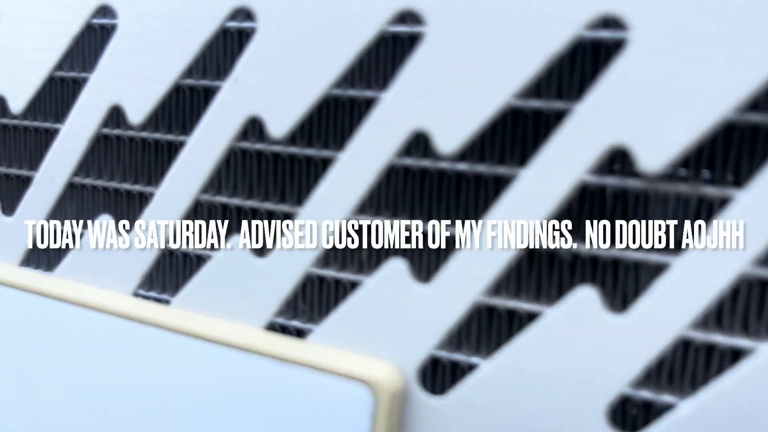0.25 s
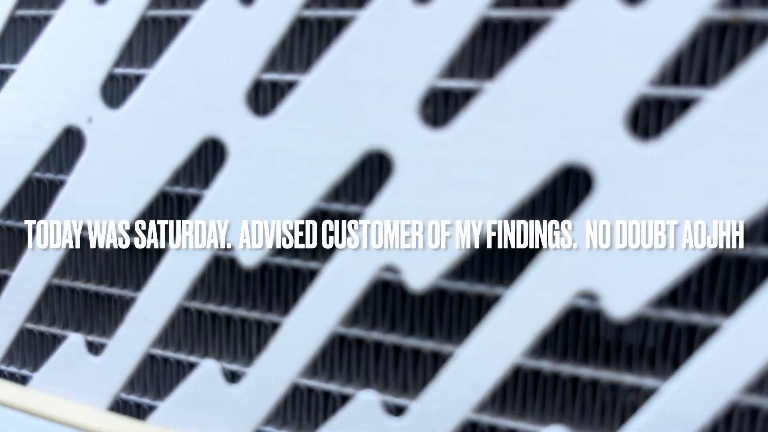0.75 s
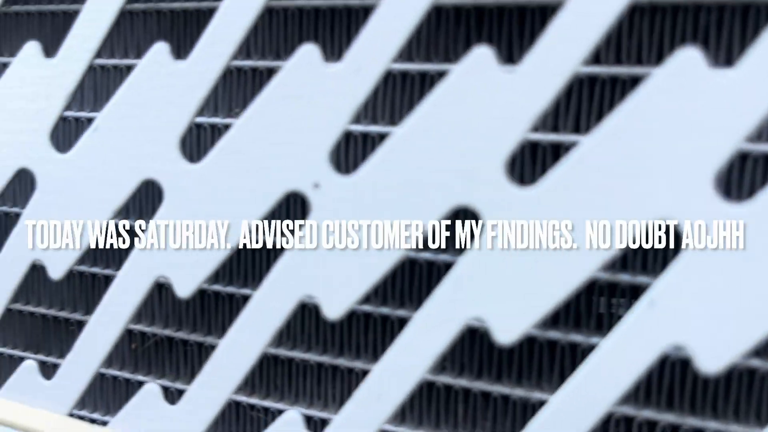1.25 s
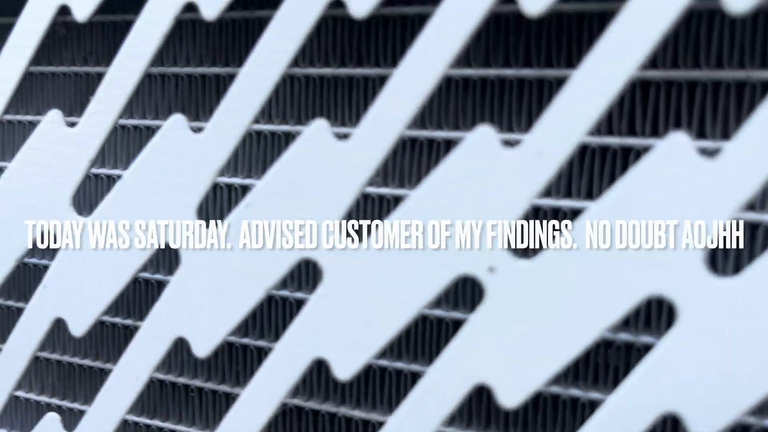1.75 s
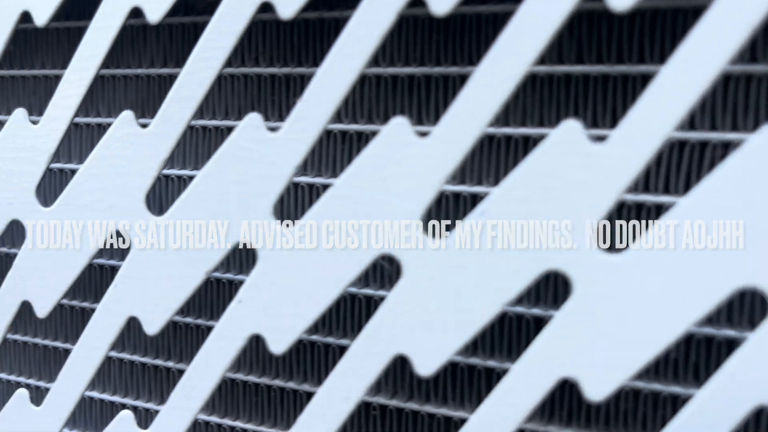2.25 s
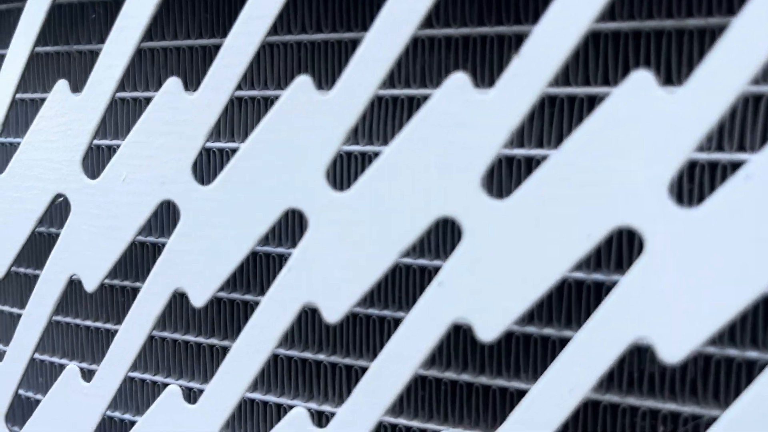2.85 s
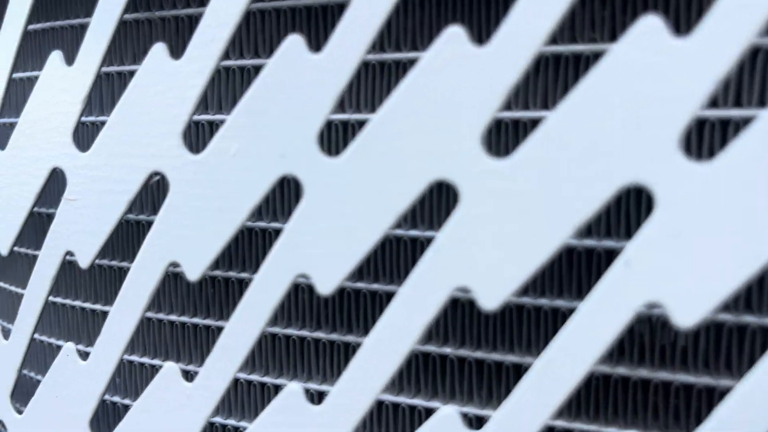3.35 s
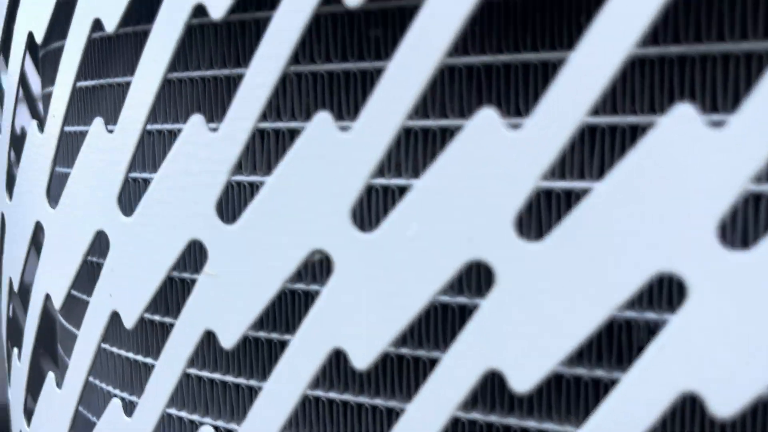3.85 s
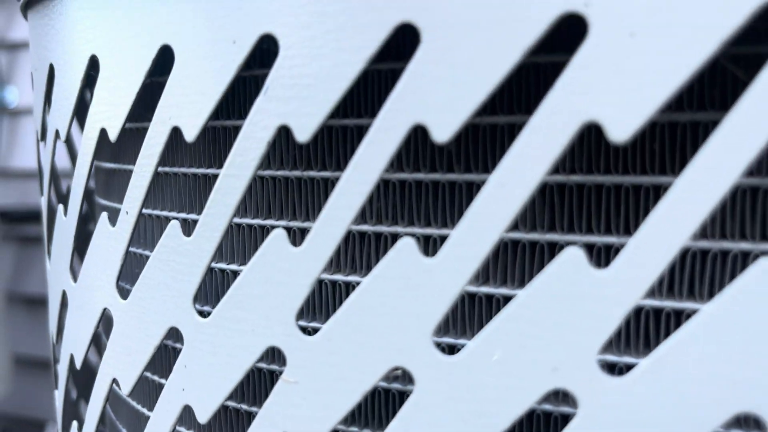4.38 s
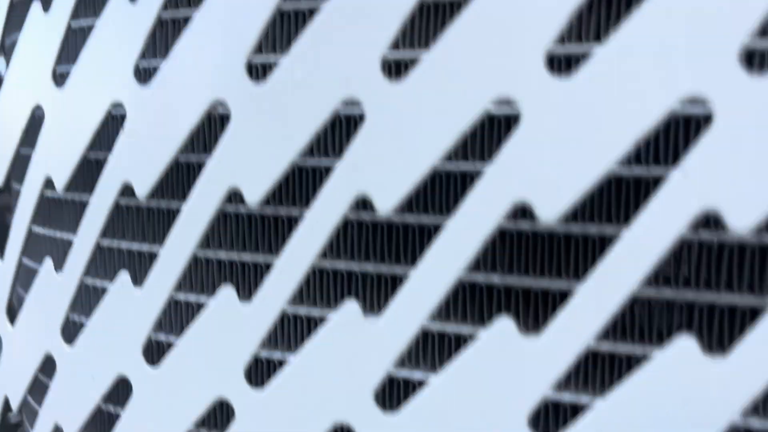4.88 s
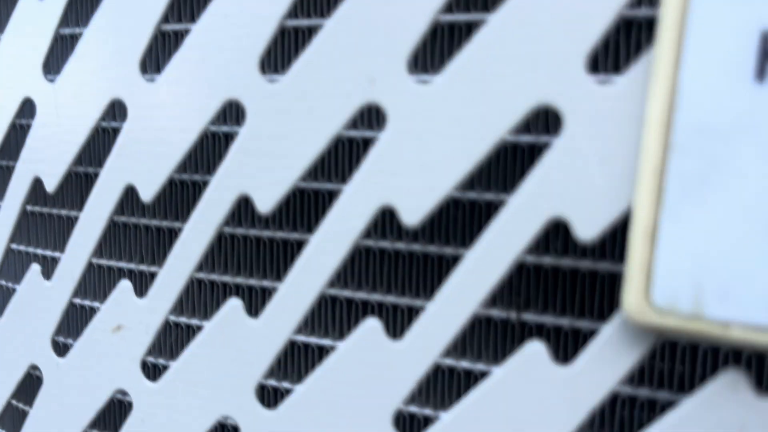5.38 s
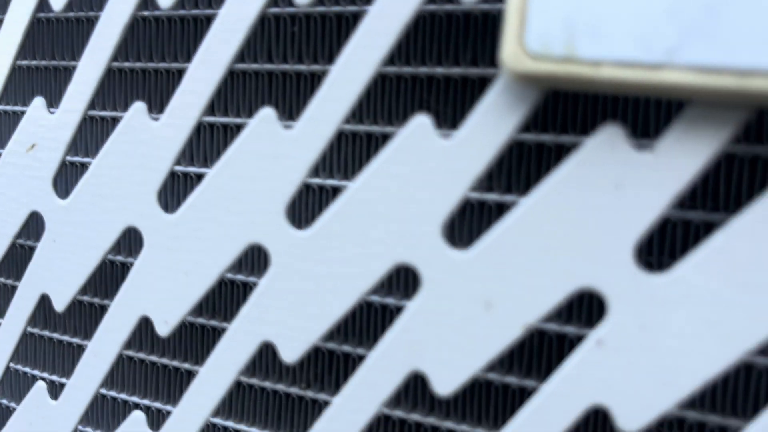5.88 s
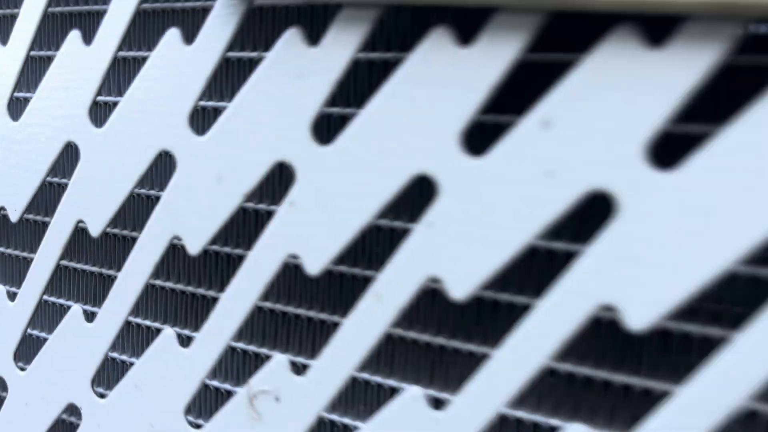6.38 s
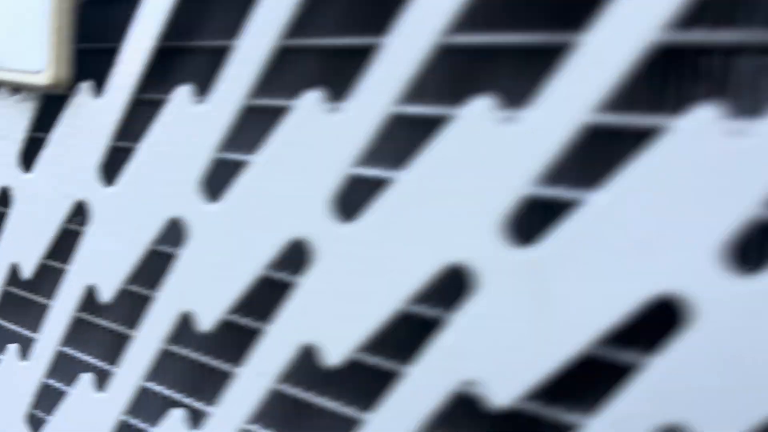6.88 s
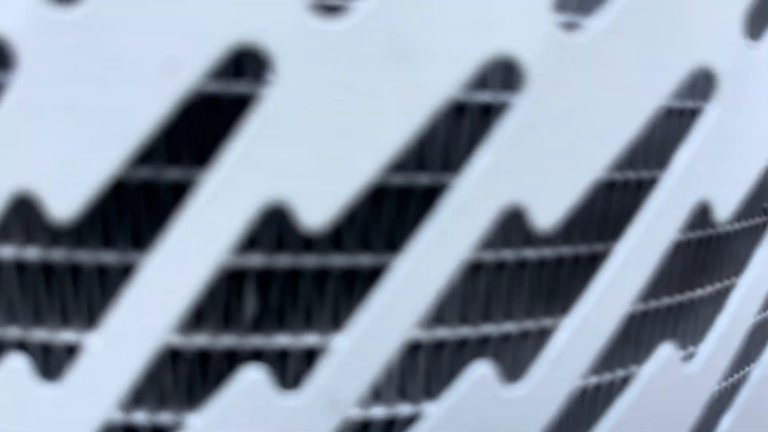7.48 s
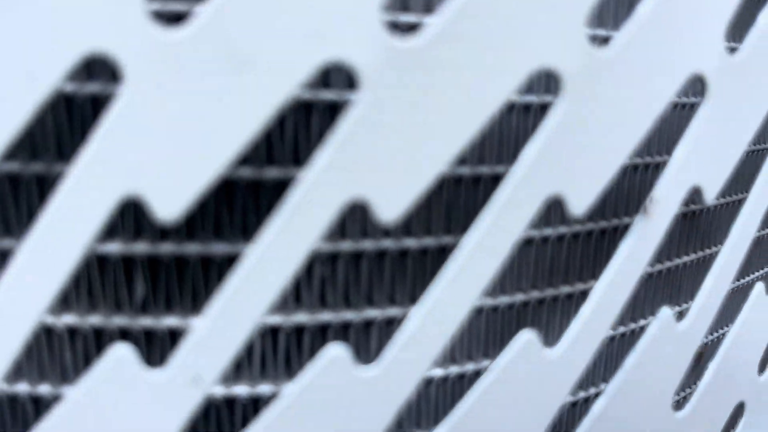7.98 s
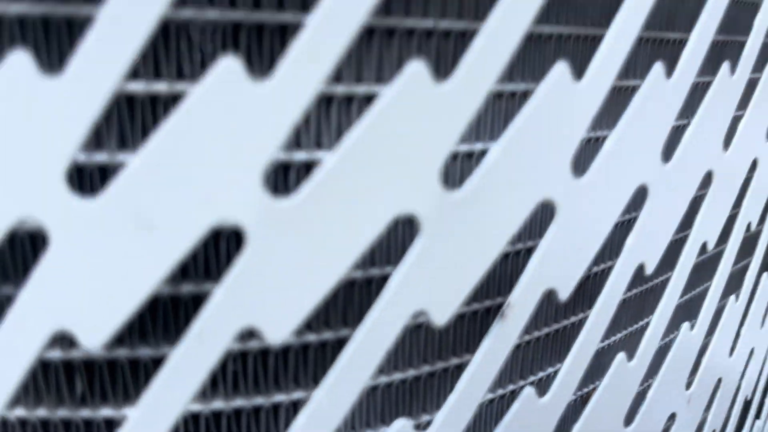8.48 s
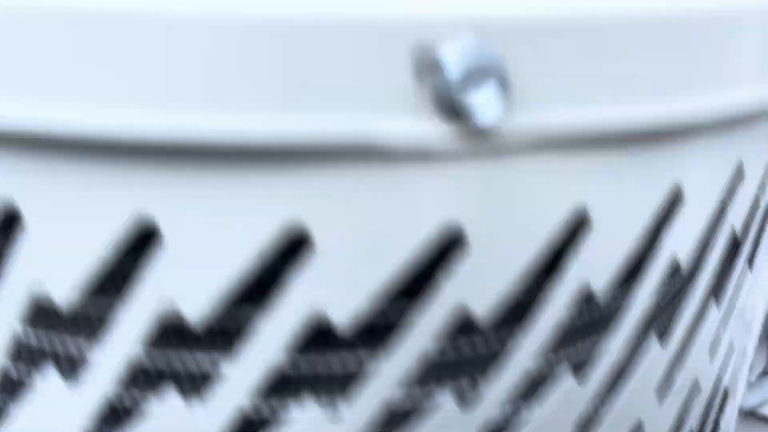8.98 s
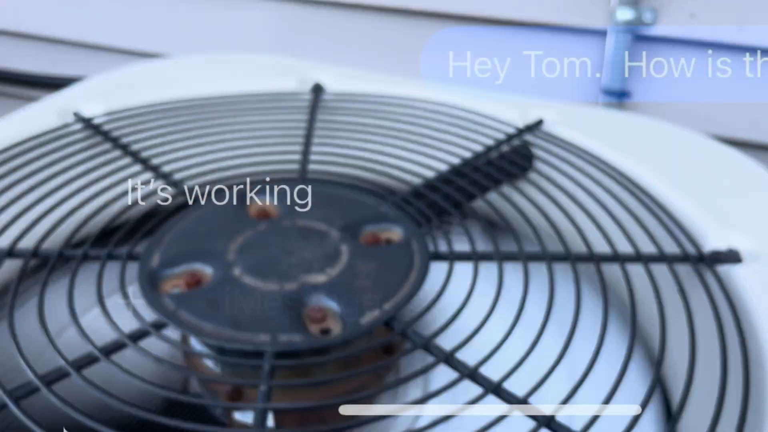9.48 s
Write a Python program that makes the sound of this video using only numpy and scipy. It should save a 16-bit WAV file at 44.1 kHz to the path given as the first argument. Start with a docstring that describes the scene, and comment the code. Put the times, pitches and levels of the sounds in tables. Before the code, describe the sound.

Heard from a handheld microphone right beside its grille, an outdoor air conditioner rumbles continuously, its fan blades chopping the rushing air into a fast pulse. A metallic compressor buzz, a hum and a thin, faint motor whine shift as the microphone moves, and low gusts occasionally buffet it. The drone dips and changes tone over the top of the unit, just before a small handling tick and a soft bump.

```python
"""A low, throbbing fan drone in a rush of air: an outdoor air-conditioning unit, heard from a phone
carried slowly along its grille and finally lifted above it. Two blades pulse at their passing rate and
chop the air into puffs, some of which slap the grille. The compressor buzzes through its ringing shell,
mains hum and a thin motor whine sit in the rush, and stray gusts buffet the microphone.
A tick of the grip and a soft finger knock come at the very end."""
import sys
import numpy as np
from scipy import signal
from scipy.fft import irfft, next_fast_len
from scipy.io import wavfile

SR = 44100
rng = np.random.default_rng(int(sys.argv[2]) if len(sys.argv) > 2 else 0)


def dump_mix(stems):
    """Bounce the given channels to the path in sys.argv[1] as a 16-bit WAV at rate SR."""
    frames = np.atleast_2d(stems).T  # one column per channel
    limited = np.clip(frames, -1, 1)  # hard clip at full scale
    pcm = np.round(limited * 32767).astype(np.int16)
    wavfile.write(sys.argv[1], SR, pcm)


N = 429534
T = np.arange(N) / SR
SIDES = np.array([[1], [-1]])  # left, right
BLADE_HZ, COMPRESSOR_HZ = 37.514, 59.035


def undb(db):
    """Decibels to gain."""
    return 10 ** (np.asarray(db) / 20)


def level(x, db):
    """Scale to an rms level."""
    return x * undb(db) / np.sqrt(np.mean(x ** 2))


def curves(table):
    """One automation curve for each column after time_s."""
    times, *columns = np.transpose(table)
    return [np.interp(T, times, column) for column in columns]


def on_log(table, hz):
    """Read a table of freq_hz, value along a log frequency axis."""
    freqs, values = np.transpose(table)
    return np.interp(np.log(hz), np.log(freqs), values)


def wander(rate_hz):
    """Smooth random modulation through rate_hz new values a second."""
    place = np.arange(0, N / SR * rate_hz + 1, 1 / 8)
    k = place.astype(int)
    blend = (1 - np.cos(np.pi * (place % 1))) / 2
    knots = rng.standard_normal(k[-1] + 2)
    return np.interp(T * rate_hz, place, knots[k] * (1 - blend) + knots[k + 1] * blend)


def swell_envelope(rows, t):
    """Amplitude of a tone that rises in flat-topped swells."""
    return np.sqrt(sum(2 * undb(db) ** 2 * np.exp(-((t - s) / half) ** 4) for s, half, db in rows))


def noise(response):
    """Noise with the amplitude spectrum response(hz)."""
    size = next_fast_len(N)
    gain = response(np.arange(1, size // 2 + 2) * SR / size)
    live = gain > 0
    bins = np.zeros(len(gain), complex)
    bins[live] = gain[live] * (rng.standard_normal(live.sum()) + 1j * rng.standard_normal(live.sum()))
    return irfft(bins, size)[:N]


def bell_noise(centre_hz, octaves, db=0):
    """A bell-shaped band of noise at an rms level."""
    bell = lambda hz: np.exp(-(np.log2(hz / centre_hz) / octaves) ** 2) * (hz < 16 * centre_hz)
    return level(noise(bell), db)


def gliding_noise(glide, width_hz):
    """A narrow band of noise that follows a pitch and level curve."""
    hz, db = curves(glide)
    flutter = noise(lambda f: np.exp(-(f / width_hz) ** 2) * (f < 1500))
    return undb(db) * level(flutter * np.sin(2 * np.pi * np.cumsum(hz) / SR), 0)


def mains_hum(waver_db=4.0, blur_rad=1.73):
    """The motors hum on multiples of the mains, wavering in level and phase."""
    # hum partials: pitch_hz, level_db
    partials = [(240, -53), (360, -49.5), (480, -41.5)]
    return np.sqrt(2) * sum(
        undb(db + waver_db * wander(1.6)) * np.sin(2 * np.pi * hz * T + blur_rad * wander(5))
        for hz, db in partials)


def motor_whine(pitch_hz=4133, waver_db=3, drift_rad=.6, pan_db=5):
    """A thin motor tone that surfaces now and then, left of centre."""
    # swells of the whine: centre_s, half_length_s, level_db
    swells = [(1.1, .8, -58), (4.1, 1.3, -61), (6.0, .4, -57), (6.55, .25, -54), (7.2, .15, -57)]
    envelope = swell_envelope(swells, T) * undb(waver_db * wander(6) + SIDES * pan_db / 2)
    return envelope * np.sin(2 * np.pi * pitch_hz * T + drift_rad * wander(8))


def fin_hiss():
    """A faint band of hiss while the phone is close to the fins."""
    # sinking hiss: time_s, centre_hz, level_db
    glide = [(6.9, 3500, -62), (7.3, 3450, -53), (8.4, 3400, -51.5), (8.95, 3220, -55), (9.1, 3150, -66)]
    return gliding_noise(glide, width_hz=170)


def rim_ring():
    """The rush rings in the gap as the phone passes the rim."""
    # rising gap resonance: time_s, centre_hz, level_db
    glide = [(8.88, 1450, -60.0), (8.94, 1650, -45.0), (8.98, 1880, -39), (9.02, 2050, -58.0)]
    return gliding_noise(glide, width_hz=130)


def grip_tick(t60_s=.012):
    """A dry, bright tick of the grip."""
    # tick: start_s, level_db
    ticks = [(9.627, -41)]
    edge = bell_noise(7000, octaves=.8)
    return sum((T > s) * undb(db - 60 * np.clip(T - s, 0, None) / t60_s) * edge for s, db in ticks)


def finger_knock():
    """A finger bumps the phone: a soft, short thump with a dry edge."""
    # thump: start_s, level_db, pitch_hz, t60_s
    knocks = [(9.657, -15.5, 280, .09)]
    edge = bell_noise(1400, octaves=.82, db=-17)
    out = 0
    for start, db, hz, t60 in knocks:
        age = np.clip(T - start, 0, None)
        out += (age > 0) * undb(db - 60 * age / t60) * (np.sin(2 * np.pi * hz * age) + edge)
    return out


def buffet(width=.31, lumps_db=2.5):
    """Stray air crosses the microphone in low, lumpy gusts."""
    # gusts: centre_s, half_length_s, centre_hz, level_db
    gusts = [(.7, .2, 68.9, -27), (3.043, 0.026, 90.5, -18.5), (3.07, 0.026, 171, -22.5),
             (3.126, 0.022, 80, -23), (3.188, .02, 200, -27.5), (3.257, 0.034, 100, -18.5),
             (4.25, 0.28, 98, -32), (5.25, 0.37, 70, -25), (6.27, 0.022, 210, -26), (6.326, 0.023, 75, -17),
             (6.62, .025, 75, -18), (6.756, 0.4, 90, -26.5), (8.099, .15, 80, -33)]
    out = 0
    for s, half, hz, db in gusts:
        mid, side = (bell_noise(hz, octaves=.57) for _ in range(2))
        envelope = np.exp(-((T - s) / half) ** 2) * undb(lumps_db * wander(22))
        makeup = np.linalg.norm(envelope) / np.linalg.norm(envelope * mid)
        out += undb(db) * makeup * envelope * (mid + width * SIDES * side)
    return out


def outflow(pressure, width=.25):
    """The jet blown through the top guard, heard only from above the rim."""
    mid, side = (bell_noise(850, octaves=.45, db=-33) for _ in range(2))
    return np.clip(-pressure, 0, 1) * (mid + width * SIDES * side)


def air_rush(puff_phase, imbalance, near_db, flicker_db=1.0, swell_db=.3):
    """Air pours through fins and grille, flickering and throbbing twice per blade pass."""
    # spectrum of the air, mid channel: freq_hz, relative_density_db
    mid_spectrum = [(27, -20), (50, 13), (95, 7), (200, 1.5), (400, -0.5), (800, -10.5), (1100, -9),
                    (1400, -14.5), (2200, -18.5), (4200, -22), (5500, -28.5), (6500, -26.5), (8000, -39.5),
                    (9800, -40.5), (11500, -39.5), (12500, -50.5), (14000, -67)]
    # spectrum of the air, side channel: freq_hz, relative_density_db
    side_spectrum = [(27, -35), (50, 0), (95, 14.5), (200, -15), (400, -7), (800, -11), (1100, -10.5),
                     (1400, -13), (2200, -26), (4200, -23.5), (5500, -31.5), (6500, -28.5), (8000, -29.5),
                     (9800, -35), (11500, -92), (12500, -88), (14000, -63)]
    # how hard the blades chop each band: freq_hz, depth
    chop_depth = [(100, .1), (300, .4), (600, .55), (1100, .25), (2000, .33), (5000, .18), (12000, .1)]
    out, swell = 0, wander(6)
    throb = .98 * imbalance * np.cos(puff_phase) + np.cos(2 * puff_phase)
    for hz in 25 * 2 ** np.arange(0, 9.6, .5):  # half-octave steps
        band = lambda f: np.cos(np.pi * np.log2(f / hz)) * (abs(np.log2(f / hz)) < .5)
        mid = noise(lambda f: band(f) * undb(on_log(mid_spectrum, f)))
        side = noise(lambda f: band(f) * undb(on_log(side_spectrum, f)))
        chop = np.sqrt(np.clip(1 + on_log(chop_depth, hz) * throb, 0, None))
        # up close the top treble grows fastest; the bass fills the yard, so its rise is cancelled
        tilt_db = near_db * (.53 * (hz > 7000) - (hz < 600))
        out += undb(tilt_db + swell_db * swell + flicker_db * wander(10)) * chop * (mid + SIDES * side)
    presence = signal.butter(4, [1700, 7000], "band", fs=SR, output="sos")
    return out / np.std(signal.sosfilt(presence, out.mean(axis=0)))


def shell_zones(bearing, pressure, shadow_db=-1.5):
    """Low edge, high edge and level curve of each shell zone: loudest face on, shaded from above."""
    # borders of the zones' bands: edge_hz
    edges = [330, 980, 2000, 7300]
    # how each zone radiates: face_on_db, facing_rad, falloff_db_per_rad
    beams = [(-43, -2.5, 1), (-56, -2.0, 2), (-50, -1.5, 2.5)]
    # gaps in the casing that bare a zone: centre_s, half_length_s, zone_low_hz, boost_db
    gaps = [(0.83, 0.47, 980, 3), (8.4, 0.49, 980, 4.5), (6.5, 0.79, 2000, 5)]
    shade_db = shadow_db * (1 - np.clip(pressure, 0, 1)) ** 2
    for low, high, (db, facing, falloff) in zip(edges, edges[1:], beams):
        gap_db = sum(boost * np.exp(-((T - s) / half) ** 4) for s, half, hz, boost in gaps if hz == low)
        yield low, high, db - falloff * abs(bearing - facing) + shade_db + gap_db


def compressor(zones, echo_gain=.4, echo_ms=2.998, drift_ms=.48, spread_ms=.06, waver_db=2.5):
    """One stroke a turn rings the shell; an echo off the casing shifts as the phone moves."""
    # shell resonances: pitch_hz, bandwidth_hz, relative_db
    modes = [(411, 37, 4), (531, 18, -5), (643, 26, 0.5), (880, 64, -3.5), (1035, 85, 4.5), (1117, 108, 4),
             (1522, 58, -12), (1720, 22, -13.5), (1865, 110, -18.5), (2340, 330, -15), (2820, 220, -16),
             (3400, 530, -19.5), (5140, 560, -19), (6080, 650, -25.5)]
    # partials that sing out of the buzz: harmonic_number
    singing = [7, 9, 11, 17, 18, 19, 20, 21, 22, 25, 26, 27, 31, 33, 35, 40, 47, 48, 51, 55]
    # standing waves crossed, one list per singing partial: centre_s, half_length_s, level_db
    swells = [
        [(2, 0.46, -40.5), (5, 0.52, -39.5), (8.2, 0.64, -39.5)],
        [(.5, 0.61, -42), (2.5, 0.83, -49), (5.2, 0.53, -47), (8.6, 0.85, -43)],
        [(1.6, 1.9, -45), (6.3, 0.42, -43.5)],
        [(1, 1.7, -47), (3, .9, -52), (5.72, 0.82, -43), (6.7, 0.3, -46.5), (8.7, .9, -51)],
        [(.5, 0.64, -46.5), (2.2, 0.57, -48.5), (3.8, 1, -46.5), (5.75, 0.79, -41), (7.4, 0.33, -47),
         (8.3, 0.49, -39.5)],
        [(1, 1.5, -43), (3.7, 1.8, -47.5), (5.8, 0.74, -48.5), (7.8, 1.1, -40)],
        [(.9, .6, -51), (4.2, 0.72, -54), (6.35, 0.8, -46), (8.1, 0.69, -44)],
        [(1.6, 0.86, -53), (4.1, 0.52, -50), (6, .8, -50), (8, .6, -52)],
        [(5.2, .3, -51), (8, 0.89, -49.5)],
        [(.8, 0.9, -49), (5.4, 0.44, -51), (7.4, 0.88, -52), (8.6, .7, -51)],
        [(1.3, 1, -52), (2.75, 0.38, -49.5), (4.9, .4, -52), (8.7, 0.47, -56)],
        [(1, 0.46, -55), (8.5, 0.65, -53)],
        [(8, 1, -57.5)],
        [(.9, .7, -56), (7.9, .6, -54)],
        [(2.2, .9, -56.5)],
        [(.4, .5, -56), (2.7, 0.86, -56.5), (8.2, 0.92, -54.5)],
        [(2.7, .4, -52.5), (5.9, .5, -55)],
        [(1.8, 1.5, -56)],
        [(3.7, .7, -54)],
        [(6.8, .3, -53)],
    ]
    hz = COMPRESSOR_HZ * np.arange(1025)
    shell = sum((-1) ** k * undb(db) / (1 + 2j * (hz - pitch) / bandwidth)
                for k, (pitch, bandwidth, db) in enumerate(modes))
    smear_rad, uneven_db = 1.15, 2.8
    shell *= np.exp(1j * smear_rad * rng.standard_normal(len(hz)))  # still in step enough to pulse
    shell *= undb(uneven_db * (hz > 2000) * rng.standard_normal(len(hz)))  # many small treble modes
    phases = np.angle(shell[singing])
    shell[singing] = 0  # these get envelopes of their own
    coarse_t = T[::64]
    envelopes = [swell_envelope(rows, coarse_t) * undb(waver_db * wander(5)[::64]) for rows in swells]
    turns = COMPRESSOR_HZ * T + .0018 * wander(2.42)
    late_ms = echo_ms + drift_ms * wander(.494)
    out = np.zeros((2, N))
    for channel in out:
        delays_ms = spread_ms * wander(.42), late_ms + spread_ms * wander(.633)
        direct, echo = ((turns - COMPRESSOR_HZ * ms / 1000) % 1 for ms in delays_ms)
        for low, high, db in zones:
            stroke = level(irfft(shell * (hz > low) * (hz < high)), 0)
            grid = np.arange(len(stroke)) / len(stroke)
            for gain, place in (1, direct), (echo_gain, echo):
                channel += gain * undb(db) * np.interp(place, grid, stroke, period=1)
        for k, phase, envelope in zip(singing, phases, envelopes):
            channel += np.interp(T, coarse_t, envelope) * np.cos(2 * np.pi * k * direct + phase)
    return out


def blade_eddies(puff_phase, imbalance, scatter_db=2.4, imbalance_db=9.5, width=.21, pan_db=-5.5):
    """Two puffs of turbulence per blade pass, each its own size; imbalance favours one of the pair."""
    count = puff_phase / np.pi + 2.45
    index = count.astype(int)
    size_db = scatter_db * rng.standard_normal(index[-1] + 1)[index]
    size_db += imbalance_db * imbalance * (-1.) ** index
    puffs = undb(size_db) * np.sin(np.pi * (count % 1) ** .65) ** 2.6  # rise faster than they fade
    swirls = (np.tanh(bell_noise(480, octaves=.87)) for _ in range(2))  # the swirl saturates
    mid, side = (level(puffs * swirl, 0) for swirl in swirls)
    soften = signal.butter(4, [230, 760], "band", fs=SR, output="sos")
    return undb(SIDES * pan_db / 2) * signal.sosfilt(soften, mid + width * SIDES * side)


def grille_slaps(eddy_db, accent_db=10, pitch_range_hz=(330, 620), t60_s=.04, width=.2):
    """Strong eddies hit the grille, each a pitched suction pulse with a broad burst of hiss."""
    # slaps: start_s
    starts = [.848, 3.855, 4.665, 4.934, 5.174, 5.786, 6.212, 6.293, 7.158, 7.185, 7.212, 7.452, 7.531,
              7.745, 7.797, 7.904, 8.172, 8.224, 8.305, 8.438, 8.489, 8.598, 9.214]
    mid, side = (bell_noise(700, octaves=.97, db=-5) for _ in range(2))
    out = 0
    for start, hz in zip(starts, rng.uniform(*pitch_range_hz, len(starts))):
        age = np.clip(T - start, 0, None)
        suction = -np.sin(2 * np.pi * hz * age)
        out += (age > 0) * undb(-60 * age / t60_s) * (suction + mid + width * SIDES * side)
    return undb(eddy_db + accent_db) * out


def strut_overtones(blade_phase, waver_db=3):
    """Blades passing the struts add faint upper harmonics that come and go."""
    out = 0
    for k in range(7, 17):
        db = -47.25 - .5 * (k - 7) + waver_db * wander(4)
        out += undb(db) * np.cos(k * blade_phase + 2 * wander(3))
    return np.sqrt(2) * out


def fan_drone(blade_phase, bearing, strength_db, pressure, waver_db=.2, spacing_rad=.15, pan_db=2.0):
    """The blades' turning pressure pattern meets a standing echo: each harmonic has a quiet bearing."""
    # blade harmonics 1 to 6: turning_db, casing_echo_db, quiet_bearing_rad
    harmonics = [(-22, -42, -1.94), (-15.6, -20.1, -3.46), (-25.2, -27.8, -2.78), (-38.7, -32.0, -3.08),
                 (-40, -58, -2.88), (-42, -48, -2.95)]
    port_bearing = bearing + SIDES * spacing_rad / 2  # the left microphone port is further round
    thinning_db = -5.5 * np.clip(-2 * pressure, 0, 1)  # odd harmonics thin out above the rim
    out = 0
    for k, (turning_db, echo_db, quiet_bearing) in enumerate(harmonics, 1):
        # the casing resonance delays the overtones, less so above the third
        lag_rad = 1.8 * (k > 1) - 1.3 * max(k - 3, 0)
        phase = k * blade_phase - lag_rad + SIDES * .011
        turning = undb(turning_db) * np.cos(phase + k * port_bearing)
        echo = undb(echo_db) * np.cos(phase + k * quiet_bearing)
        gain_db = strength_db * (.36 if k == 1 else 1) + thinning_db * (k % 2) + waver_db * wander(11)
        out += undb(gain_db) * (turning - echo)
    pan = undb(SIDES * pan_db / 2 * np.clip(pressure, 0, 1))
    return np.sqrt(2) * pressure * pan * out


def scene():
    """The stereo mix, following the phone around the casing and over the rim."""
    # walk around the fan's pressure pattern: time_s, bearing_rad, drone_gain_db
    path = [(0, -2.13, 0), (.9, -2.26, -1.6), (1.6, -2.56, -4.2), (2.1, -3.0, -5.2), (2.7, -3.29, -5.1),
            (3.6, -3.47, -.2), (4.5, -3.52, -4.0), (5.1, -3.55, .5), (5.9, -3.71, .8), (6.4, -3.4, .4),
            (6.62, -3.12, -.5), (6.8, -2.34, -1.5), (7.3, -1.35, 1.3), (8.0, -1.24, 2.0), (8.7, -1.33, .1),
            (9.2, -2.2, 0), (9.74, -2.2, -1.5)]
    # lift from the suction side (+) to the blowing side (-): time_s, blade_pressure_factor
    lift = [(8.62, 1.0), (9.06, 0.16), (9.24, -0.55)]
    # airflow along the walk: time_s, rush_gain_db, eddy_gain_db
    airflow = [(0, -42.5, -30), (.9, -43, -33), (1.6, -43, -31.5), (2.5, -43, -33), (3.9, -43.5, -33.5),
               (4.8, -43.5, -33), (5.5, -41.5, -31), (6.8, -40.5, -29), (7.05, -41.5, -28.5),
               (7.6, -42.5, -32.5), (8.2, -41.5, -28.5), (8.75, -43.5, -32), (9.2, -42, -32),
               (9.74, -43.5, -32.5)]
    # which puff of each pair is stronger: bearing_rad, imbalance (-1 to 1)
    puff_balance = [(-1.5, -0.31), (-2.5, -0.41), (-1.75, 1)]
    bearing, strength_db = curves(path)
    pressure, = curves(lift)
    rush_db, eddy_db = curves(airflow)
    imbalance = np.interp(bearing, *np.transpose(puff_balance)) * np.sign(pressure)
    blade_phase = 2 * np.pi * BLADE_HZ * T
    puff_phase = blade_phase + 1.9  # where in the pass the eddies reach the grille
    rush = undb(rush_db) * air_rush(puff_phase, imbalance, near_db=rush_db - np.mean(rush_db))
    lopsided_db = -5.5 * abs(imbalance)  # uneven pairs of puffs are turned down
    eddies = undb(eddy_db + lopsided_db) * blade_eddies(puff_phase, imbalance)
    motors = compressor(list(shell_zones(bearing, pressure))) + mains_hum() + motor_whine()
    drone = fan_drone(blade_phase, bearing, strength_db, pressure)
    fan = drone + outflow(pressure) + strut_overtones(blade_phase)
    close_air = buffet() + rim_ring() + fin_hiss() + grille_slaps(eddy_db)
    return rush + eddies + motors + fan + close_air + finger_knock() + grip_tick()


def record(dry, low_cut_hz=29, high_cut_hz=12700):
    """The phone steeply cuts the deepest bass and the top."""
    low_cut = signal.butter(4, low_cut_hz, "high", fs=SR, output="sos")
    high_cut = signal.ellip(8, .2, 70, high_cut_hz, fs=SR, output="sos")
    return signal.sosfilt(high_cut, signal.sosfiltfilt(low_cut, dry))


dry = scene()
out = record(dry)
dump_mix(out)
```